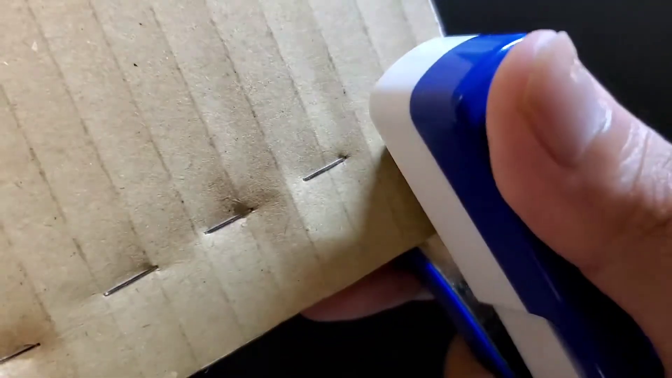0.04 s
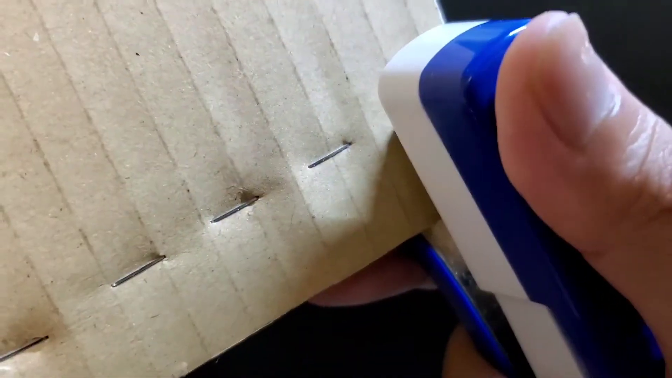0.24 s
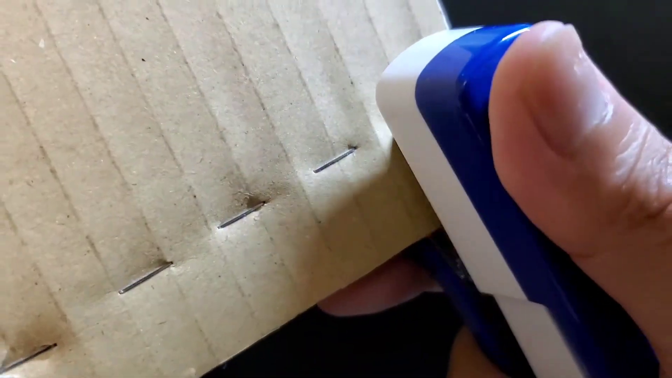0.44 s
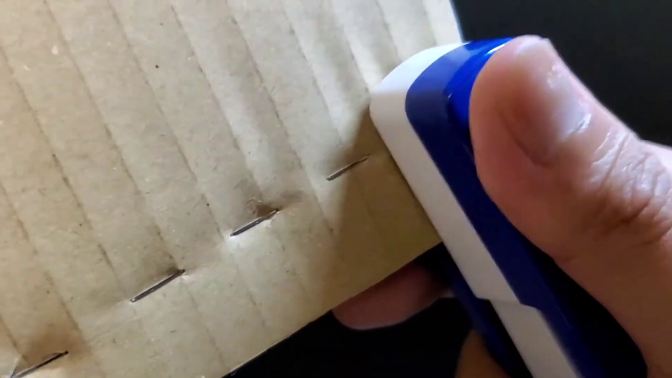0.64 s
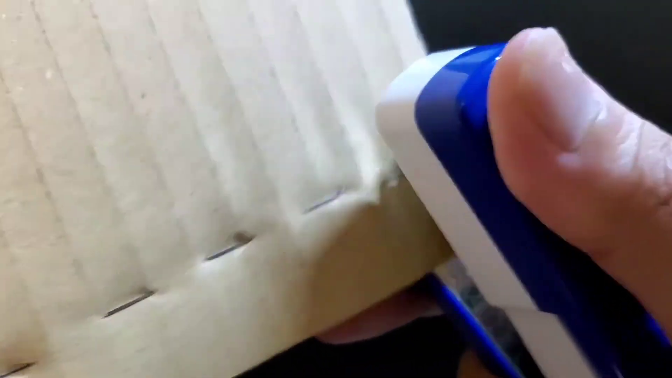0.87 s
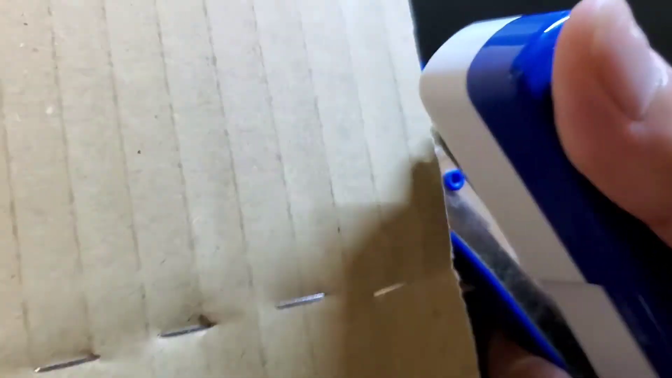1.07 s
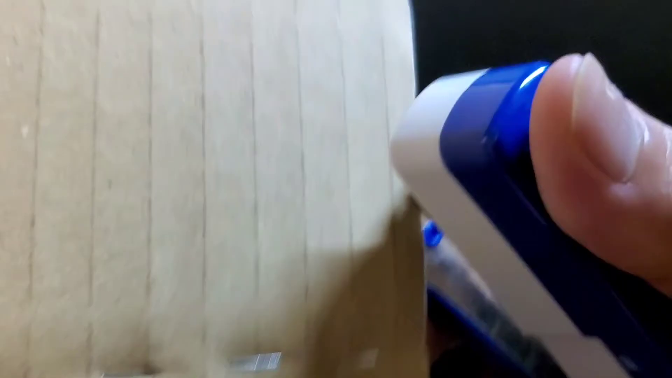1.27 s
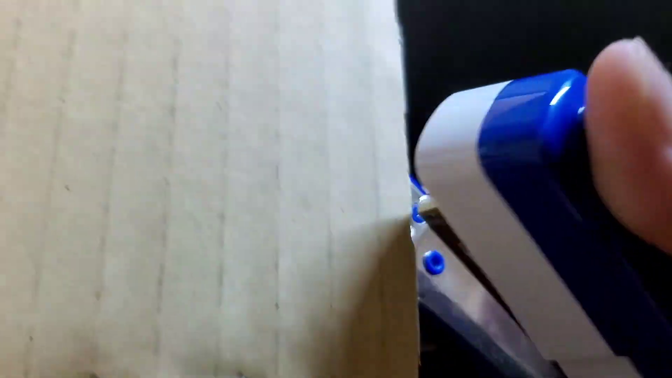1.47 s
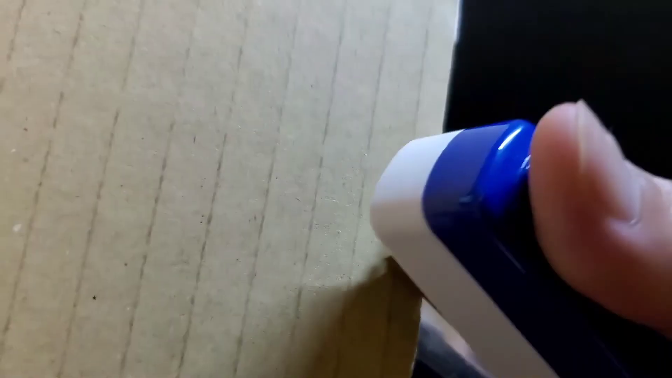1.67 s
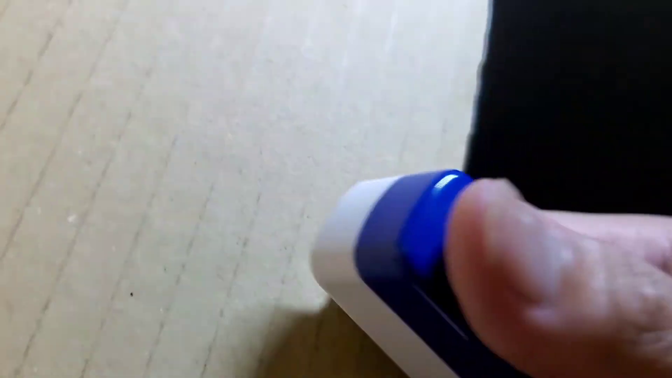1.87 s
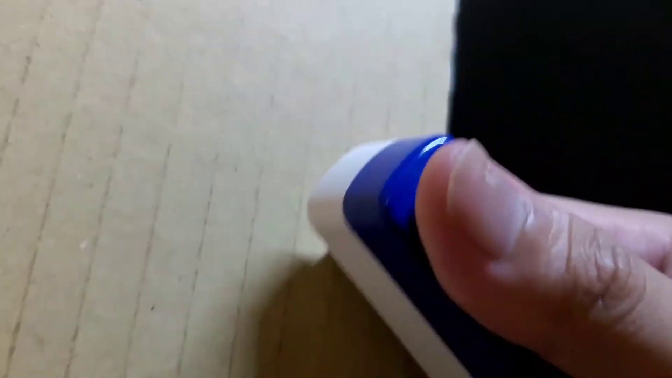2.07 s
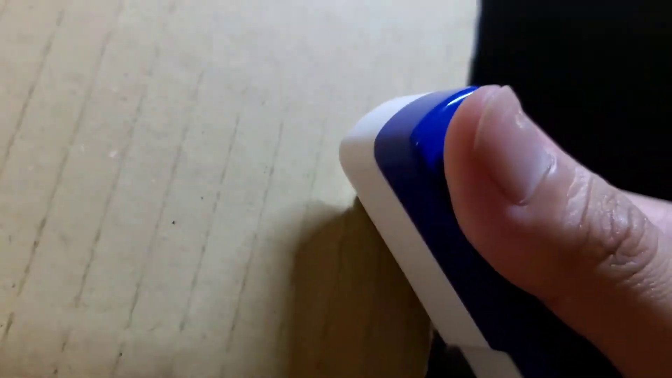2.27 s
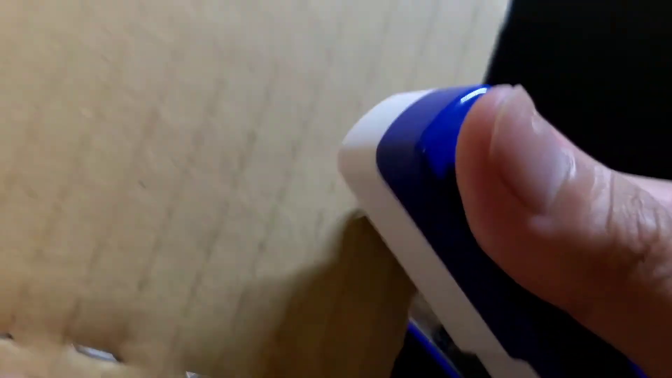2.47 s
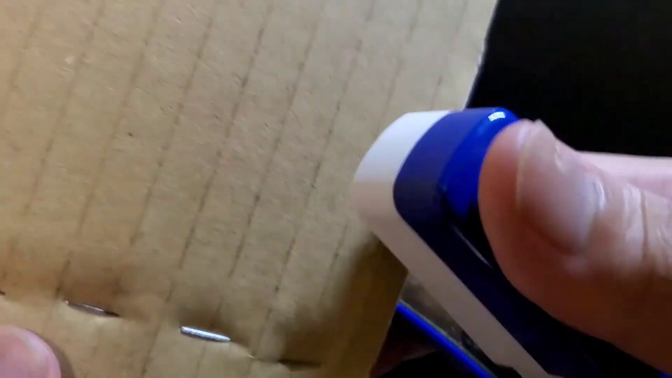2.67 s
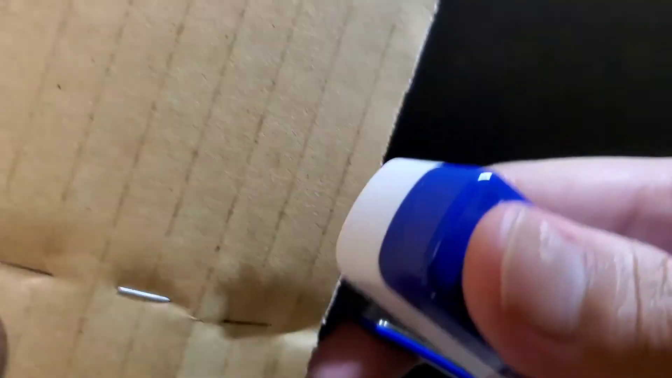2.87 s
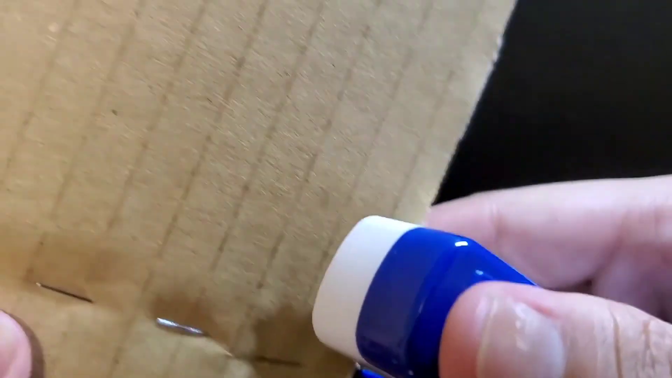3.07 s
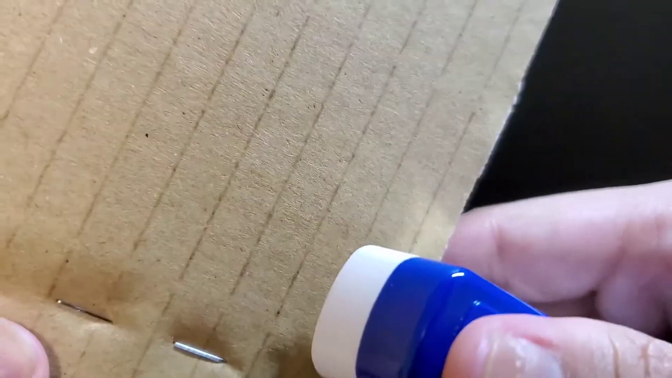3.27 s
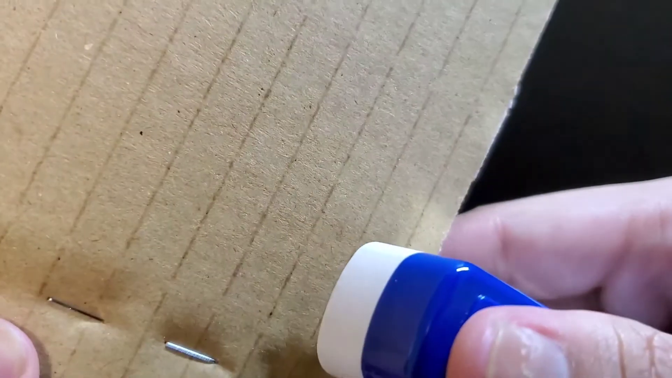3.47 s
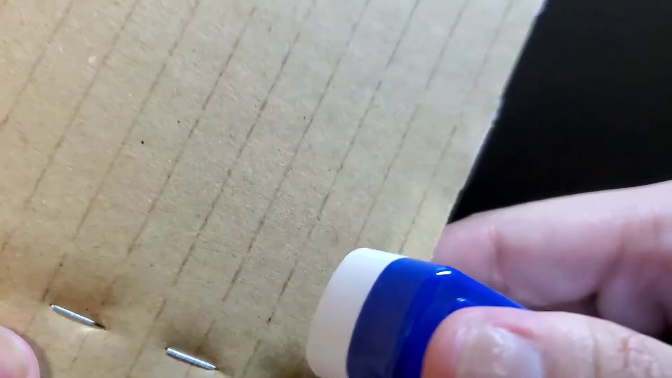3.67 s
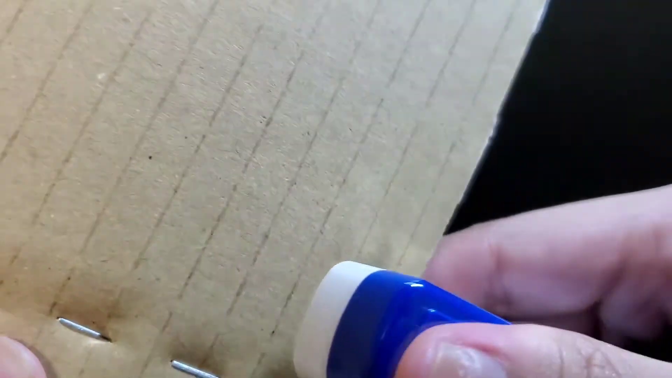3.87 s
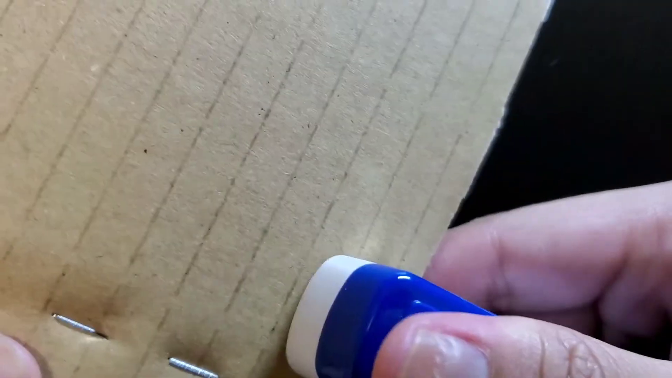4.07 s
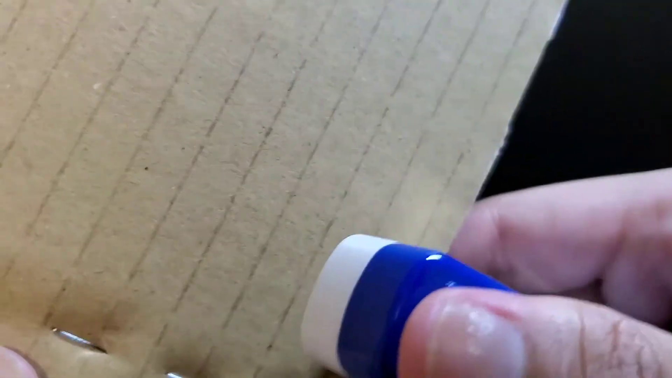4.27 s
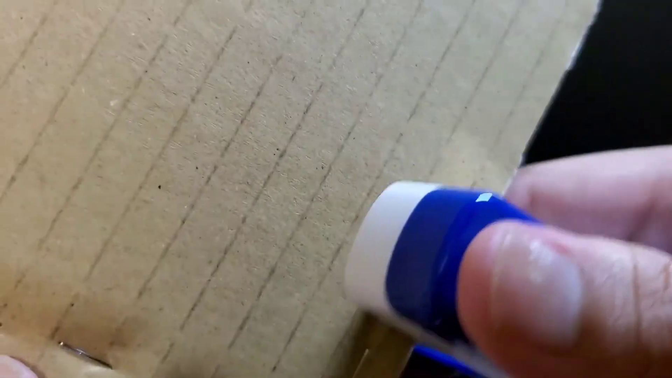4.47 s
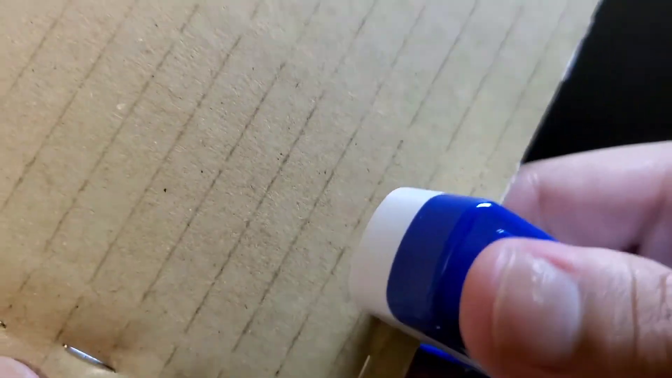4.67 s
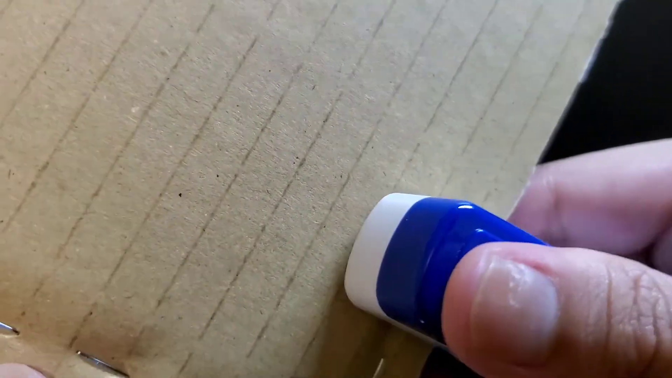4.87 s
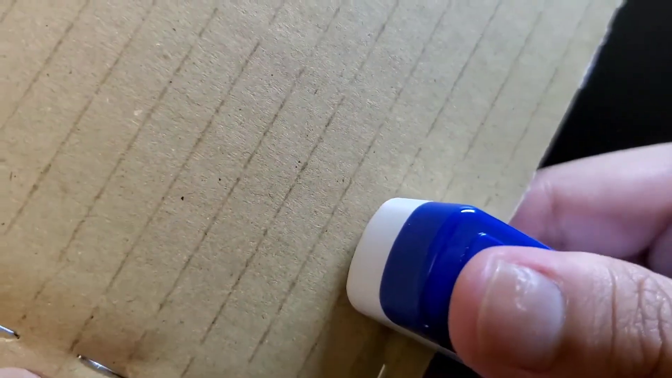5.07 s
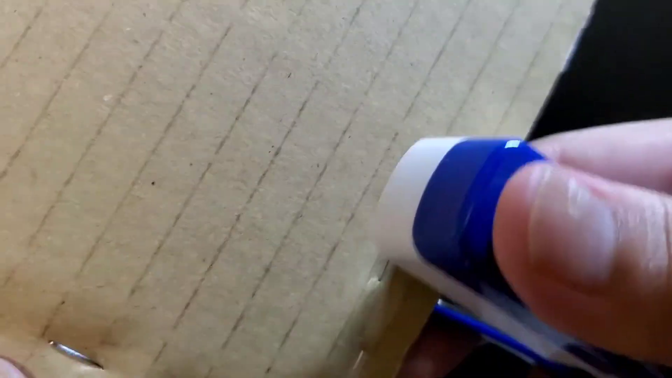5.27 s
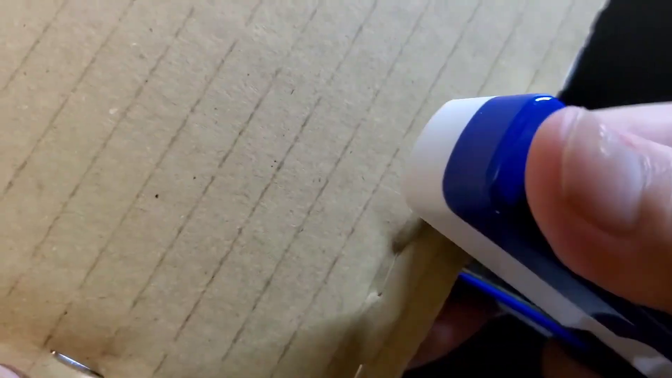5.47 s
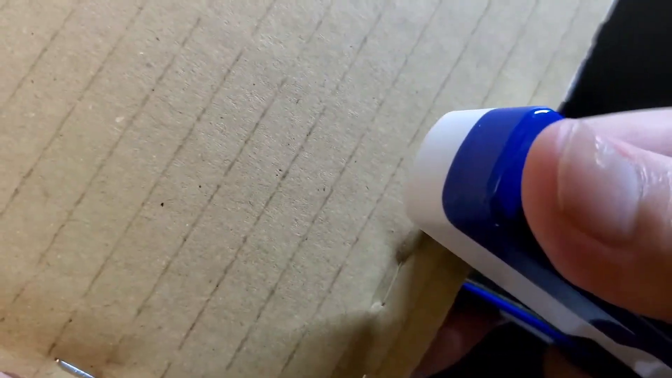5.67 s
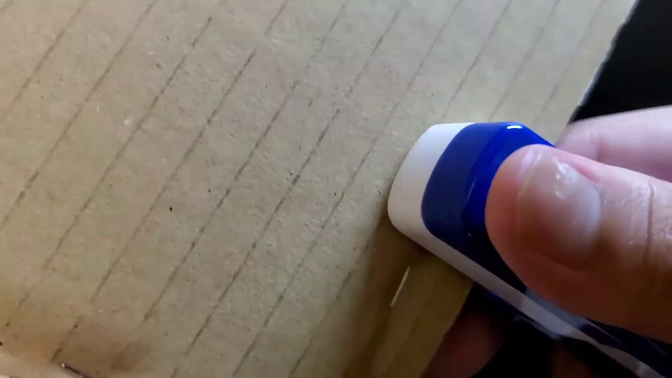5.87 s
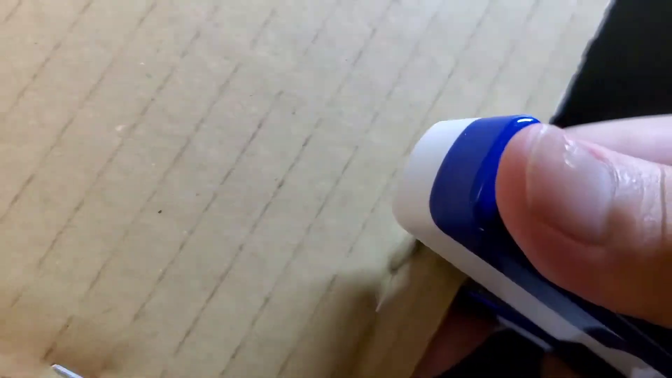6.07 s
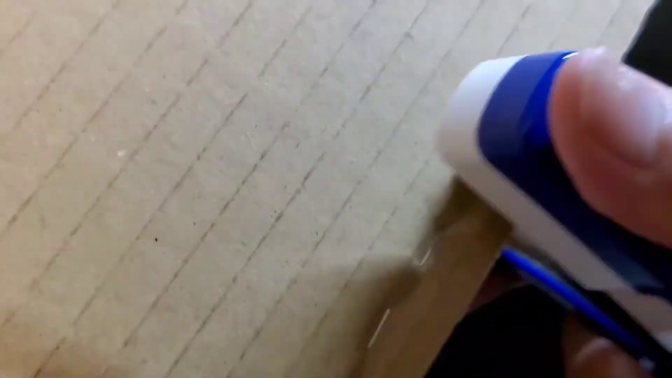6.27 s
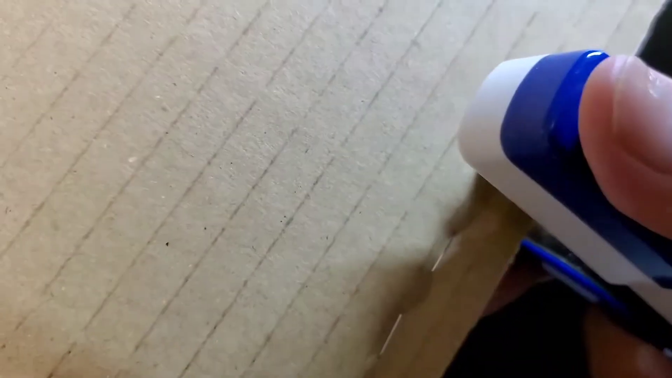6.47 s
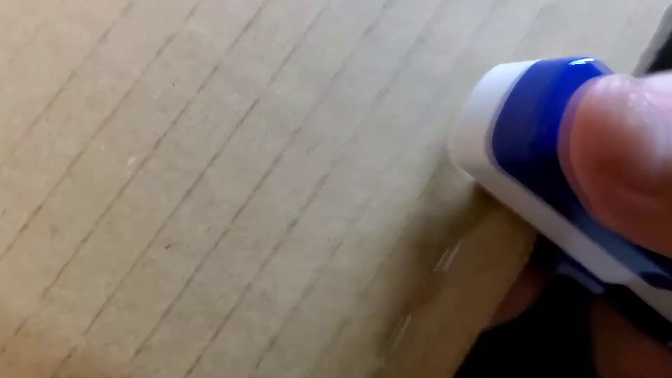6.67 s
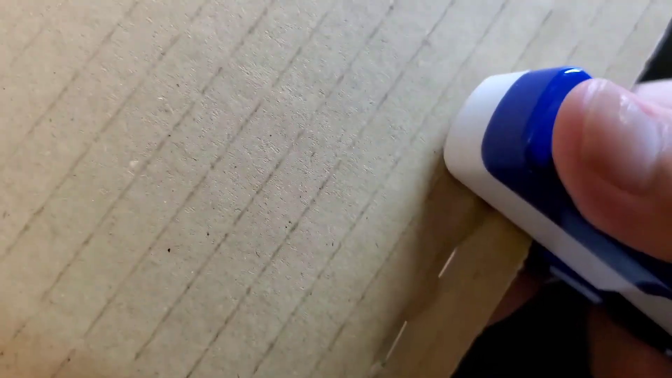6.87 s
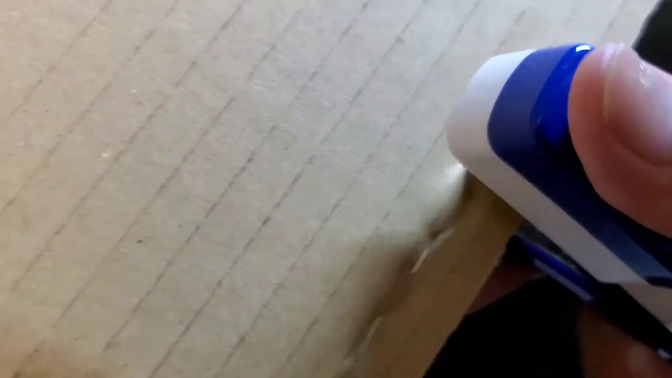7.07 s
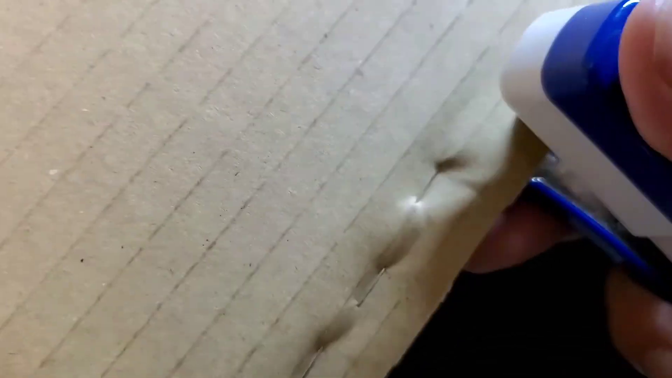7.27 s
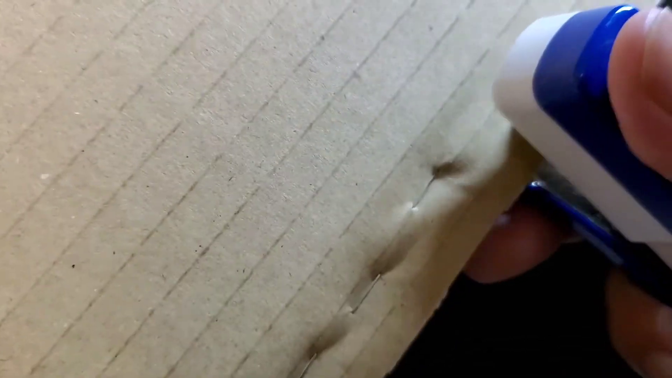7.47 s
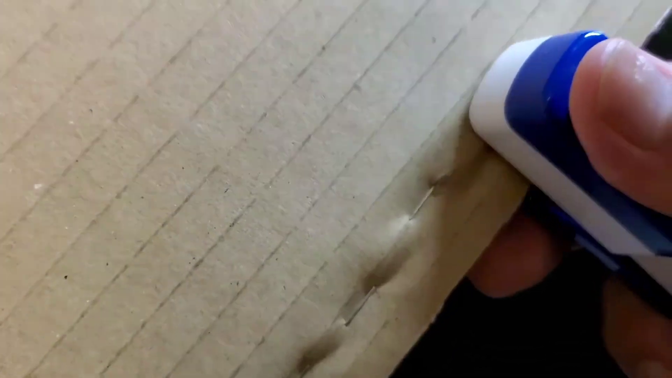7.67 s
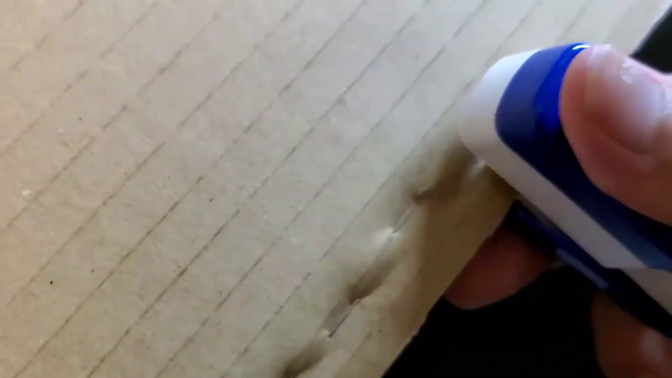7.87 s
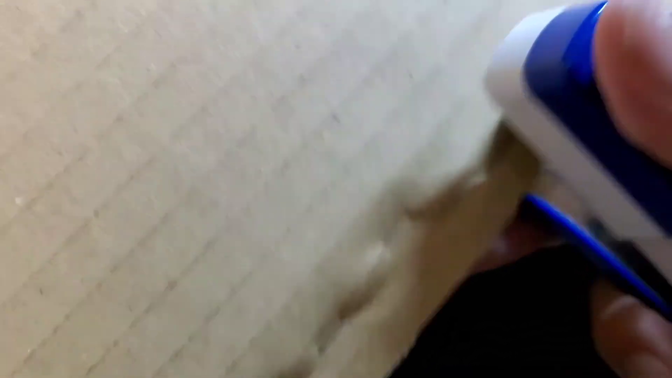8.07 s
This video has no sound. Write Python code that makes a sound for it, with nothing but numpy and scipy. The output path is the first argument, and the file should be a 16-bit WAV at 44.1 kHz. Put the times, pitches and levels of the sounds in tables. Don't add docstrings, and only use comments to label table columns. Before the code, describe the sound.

A stereo microphone sits right beside a plastic-bodied stapler and stiff cardboard. One loud metallic crack and clacking release come first, then dry scuffs, finger taps and loose metal rattles as the sheet is moved. Five more crunching snaps follow at an even pace, each booming briefly through the board, with a short indoor tail and faint room air.

```python
import sys
import numpy as np
from scipy import signal
from scipy.fft import rfft, irfft
from scipy.io import wavfile
from scipy.ndimage import uniform_filter1d

SR = 44100
rng = np.random.default_rng(int(sys.argv[2]) if len(sys.argv) > 2 else 0)


def inscribe(sig):
    pcm = np.round(np.clip(np.atleast_2d(sig).T, -1, 1) * 32767)
    wavfile.write(sys.argv[1], SR, pcm.astype(np.int16))


def field_ratio(decibels):
    return 10 ** (np.asarray(decibels, dtype=float) / 20)


N = 358091
LEAD = 1300

# (frequency [Hz], level [dB], decay by 60 dB [s])
STEEL = [(2950, -3, 0.0067), (3314, -3.5, 0.0088), (4110, 0, 0.0032), (5446, -1, 0.0061),
         (5960, -0.5, 0.0042), (6850, -5.5, 0.013), (7810, -2.5, 0.0045)]
TOP = [(10070, -1.5, 0.0031), (11360, -2, 0.0094), (13600, 0, 0.0014)]
SHELL = [(1827, -19, 0.025), (2004, 7, 0.011), (2150, -1.5, 0.0027)]
SPRING = [(1100, -9.5, 0.28), (1830, -10.5, .35), (2100, 0, 0.24), (2200, -2, .45), (2325, -9, 0.48),
          (2750, -10, 0.21), (4300, -12.5, .25)]
UPPER = [(756, -6.5, 0.029), (791, -2, 0.013), (1170, -5, 0.0036), (1450, -6.5, 0.0018)]
MIDDLE = [(430, -7, 0.064), (510.5, 2, 0.05), (547, 6.5, 0.014)]
BOOM = [(148, -9.5, 0.062), (192.6, 2, 0.07), (237, 9.5, 0.022), (325, 1.5, 0.087)]
SHAKE = [(64, -4, 0.57), (75, -12, 0.05)]
SHEET = [(824, 4.5, 0.23), (797, -2, 0.23)]

# (time [s], steel peak [dB], shell re steel [dB], left-right [dB])
TOUCHES = [
    (0.4256, -31.5, -15, -0.5),
    (3.8292, -35, -15, -2),
    (3.8413, -30.5, -23.5, -0.5),
    (4.8199, -33.5, -28.5, -1.5),
    (4.8264, -40, -36, -4),
    (5.8358, -30, -19.5, -3),
    (6.6882, -33.5, -25.5, -3.5),
    (7.508, -42.5, -16, -3),
    (7.5288, -41, -19, -8),
]
TICKS = [
    (0.5466, -46, -17.5, -4),
    (3.933, -53, -17.5, 7),
    (4.896, -46.5, -28, 0.5),
    (5.8972, -45, -23.5, -6),
    (6.7457, -53, -9.5, -2.5),
    (7.6125, -46.5, -22.5, -5.5),
]
SNAPS = [
    (0.6405, -10.5, -7, -9),
    (4.0203, -11, -9, -3),
    (4.9881, -10.5, -7.5, -3.5),
    (5.9519, -10, -9.5, -5),
    (6.8024, -11, -7, -3.5),
    (7.7412, -13, -4, -3),
]
RELEASES = [
    (0.9342, -24.5, -6.5, 2.5),
    (4.2957, -22, -7.5, 1.5),
    (5.2765, -22.5, -7.5, -3),
    (6.1782, -26, -4.5, 0),
    (7.0666, -28, -3, -1),
    (8.0234, -26, -2, -2),
]
REBOUNDS = [
    (0.9713, -30.5, -9.5, 3),
    (4.324, -42, -9, 4),
    (5.2579, -47, -12.5, 0),
    (5.3492, -44.5, -9.5, 0),
]
# (rows, top end re steel [dB], contact [ms])
PRESS = [(TOUCHES, -18.5, 5), (TICKS, -14.5, 2.4), (SNAPS, -10.5, 4.5), (RELEASES, -11.5, 4.37),
         (REBOUNDS, -8.5, 3)]
# (time [s], steel peak [dB], shell re steel [dB], top re steel [dB])
SLIDE_RATTLES = [(1.1593, -63, 6, 4), (1.2032, -71, -19, -19), (1.3922, -45.5, -6.5, -3.5),
                 (1.521, -53, -2.5, -9), (1.6282, -48.5, -18, -31), (1.7503, -52.5, -9, -20),
                 (1.8278, -45, -15, -14), (1.841, -44, -18, -2.5), (1.8911, -49.5, -9.5, -11),
                 (2.0542, -49.5, -8, -12), (2.2734, -53, -12, -13), (2.4463, -49.5, -34, -13),
                 (2.5253, -68, 13, -23), (2.5401, -47.5, -10, -7), (2.6284, -65, -4, 4),
                 (2.6968, -54.5, -6, -18), (2.8556, -67, -16, 9.5), (3.344, -48.5, -18, -14)]
STEP_RATTLES = [(0.0094, -69.5, 1, -22), (3.3175, -50, -5.5, -40), (4.4893, -46, -13.5, -19),
                (4.5471, -57, -9.5, -29), (4.6694, -70, 7.5, -28), (6.416, -52, -9.5, -28),
                (7.3393, -53.5, -5.5, -13)]
# (rows, left-right [dB], contact [ms])
RATTLE = [(SLIDE_RATTLES, 1.5, 6.2), (STEP_RATTLES, 0, 6.9)]

# (time [s], upper modes peak [dB], middle re upper [dB], boom re upper [dB])
SNAP_BLOWS = [
    (0.64, -17.5, -3, -4.5),
    (4.021, -11.5, -12.5, -15.5),
    (4.992, -17, -8, -7.5),
    (5.951, -15, -6.5, 0),
    (6.8022, -13.5, -11.5, -3.5),
    (7.742, -15.5, -4.5, 0),
]
JAW_BLOWS = [(0.423, -38.5, 0, -3), (0.936, -23, -13, -12), (3.826, -30, -12.5, -9.5),
             (3.839, -38.5, -5, -4.5), (4.299, -19, -15.5, -13), (4.325, -39, -2.5, -5), (4.818, -46, 2, 0),
             (5.279, -15, -14, -14), (5.347, -33, -10, -16), (5.839, -40, -1, -1), (6.177, -29, -8.5, -10),
             (6.691, -36.5, -4, -9.5), (7.066, -35, -12.5, -8), (7.509, -59, 9.5, 1), (7.529, -42, -10, 2),
             (8.021, -36, -3, -1.5), (8.06, -47, -2, 1)]
FINGER_TAPS = [(0.073, -47.5, -3.5, -4.5), (1.079, -57, 8, 7.5), (1.158, -31, -7, -2.5),
               (1.17, -54.5, 13, 15.5), (1.393, -71.5, 9, 23), (1.671, -57.5, 11.5, 1),
               (1.747, -41.5, -11.5, -0.5), (1.828, -56.5, 12, 9), (1.895, -65, 11, -3.5),
               (1.909, -58, -14, 9), (1.936, -57.5, 10, 10), (2.059, -66, 18.5, 19),
               (2.119, -71.5, 18, 10.5), (2.273, -44, 1.5, -3.5), (2.533, -51, 1.5, 0.5),
               (2.579, -60, 9, 1), (2.594, -59, 2, 6), (2.625, -41, 2, -0.5), (2.726, -53.5, 2, 2),
               (2.819, -55.5, 0.5, 12.5), (2.851, -38.5, -7.5, -1), (2.938, -51.5, -5.5, 5.5),
               (3.162, -77, -13, 19.5), (3.343, -33, -8.5, -9.5), (4.512, -55, 6, 6),
               (4.668, -35, -8, -17.5), (6.45, -53, -3.5, -7.5), (7.292, -43.5, -8.5, -1.5),
               (7.358, -43, -1.5, 2.5)]
# (rows, contact [ms], extra contact per dB of boom [ms/dB])
BLOW = [(SNAP_BLOWS, 2.7, -0.2), (JAW_BLOWS, 2.1, 0.023), (FINGER_TAPS, 1.83, 0.069)]

# (start [s], hold [s], paper
# hiss [dB], board murmur [dB])
RUB_STROKES = [(0.0, 0.11, -80, -63.5), (0.365, 0.15, -95, -66), (0.538, .1, -75, -67.5),
               (.68, 0.079, -75.5, -74), (.98, 0.11, -70, -76), (1.155, 0.14, -77.5, -68),
               (1.392, 0.007, -63, -59), (1.515, 0.019, -65.5, -54), (1.682, 0.007, -54.5, -47.5),
               (1.744, 0.019, -63.5, -58.5), (1.85, .06, -62.5, -61), (1.9, .021, -69, -52.5),
               (1.952, 0.018, -59, -68), (2.064, 0.2, -60.5, -58.5), (2.285, 0.0091, -71, -58.5),
               (2.37, 0.024, -66, -60), (2.468, 0.017, -58, -61.5), (2.608, 0.012, -61.5, -45.5),
               (2.715, .015, -62.5, -57.5), (2.836, 0.017, -74, -54), (2.952, 0.021, -74, -60.5),
               (3.174, 0.026, -78.5, -75), (3.315, 0.13, -78, -76),
               (3.81, .19, -74, -65.5), (4.048, 0.29, -85.5, -83), (4.491, .03, -98, -52),
                (4.58, .1, -112, -63), (4.861, .03, -84.5, -61.5), (4.95, 0.37, -82, -81.5),
                (5.45, .04, -77, -62), (5.509, 0.0079, -73, -59), (5.88, 0.016, -72, -55.5),
                (5.95, 0.31, -81.5, -61.5), (6.33, 0.029, -85, -48.5), (6.43, 0.025, -94, -63.5),
                (6.73, 0.028, -75, -55.5), (6.8, 0.27, -74.5, -77.5), (7.22, 0.076, -68.5, -52),
                (7.35, 0.007, -84, -56), (7.551, 0.067, -83.5, -67.5), (7.8, 0.11, -84.5, -85.5),
                (8.0, 0.033, -73, -55.5), (8.08, 0.011, -88, -71)]
# (frequency [Hz], level per Hz [dB])
HISS = [(530, -40.5), (900, -7.5), (1030, -12.5), (1680, -8), (1930, -4.5), (2640, -8), (14600, -10),
        (15600, -66.5)]
RUMBLE = [(8.8, -42.5), (15, -8), (54, 5), (86, -14.5), (151, -6), (185, -18.5), (260, -56), (440, -120)]
# (time [s], level [dB])
HAND = [(0.0, -67.5), (4.23, -69), (4.41, -71), (7.01, -76.5), (7.24, -81.5), (8.12, -66.5)]
# (frequency [Hz], left-right likeness [0-1])
SAME = [(60, 1), (240, 0.3), (950, 0.11), (3770, 0.035), (15000, 0.09)]

# (frequency [Hz], decay by 60 dB [s])
ROOM = [(100, 0.35), (260, 0.88), (700, 0.66), (1840, 0.21), (4850, 0.26), (12800, 0.17)]
# (frequency [Hz], level per Hz [dB])
FLOOR = [(59, -31.5), (100, 4), (578, -21), (1240, -23.5), (7160, -39), (8300, -47), (14100, -32),
         (15600, -56)]
# (frequency [Hz], level [dB])
WHINE = [(399, -4), (798, -5)]
# (time [s], level [dB])
WHINE_DB = [(0, -105.), (3.9, -105.), (4.3, -88), (5.6, -77.5), (6.0, -82.5), (6.55, -87), (7.0, -94),
            (8.12, -99)]


def stapler():
    rows = contacts()
    out, trains = np.zeros((2, N + LEAD)), np.zeros((3, N))
    rain = rng.standard_normal((len(rows), 2, 1700))
    detune = rng.uniform(0.94, 1.05, (len(rows), 7))
    for (s, db, shell_db, top_db, pan_db, ms), r, d in zip(rows, rain, detune):
        steel = ring(contact(ms, r, same=0.5, power=1, scrape_db=-24.5), STEEL, d, lead_us=165)
        top = ring(contact(0.86 * ms, r, same=0.98, power=2, scrape_db=-25.5), TOP, d, lead_us=140)
        shell_force = contact(ms, r, same=0.52, power=2, scrape_db=-31)
        shell = ring(shell_force, SHELL, 1 + 0.82 * (d - 1), lead_us=30, size=4096)
        add(out, s, field_ratio(db - 0.5) * sides(pan_db) * steel)
        add(out, s, field_ratio(db + top_db + 6.5) * sides(0.65 * pan_db) * top)
        add(out, s, field_ratio(db + shell_db + 9) * sides(pan_db) * shell)
        trains[:, round(s * SR)] = field_ratio(db + np.array([0, top_db + 7, shell_db + 12])) * np.sqrt(ms)
    blunt = [[(hz, db, 0.51 * t60) for hz, db, t60 in body] for body in (STEEL, TOP)]
    around = heard_around(trains, blunt + [SHELL])
    spring = heard_around(trains[2:], [SPRING])
    return out[:, LEAD:], around, spring


def contacts():
    found = []
    for rows, top_db, ms in PRESS:
        found += [(s, db, shell_db, top_db, pan_db, ms) for s, db, shell_db, pan_db in rows]
    for rows, pan_db, ms in RATTLE:
        found += [(*row, pan_db, ms) for row in rows]
    return sorted(found)


def contact(ms, rain, same, power, scrape_db):
    t_ms = (np.arange(rain.shape[1]) - LEAD) * 1000 / SR
    u = np.maximum(t_ms, 0) / min(ms, 5)
    chatter = 0.92 * u ** 0.36 * np.exp(-2.4 * u ** 1.6)
    scrape = field_ratio(scrape_db + 1.5 * t_ms) * (t_ms < 0)
    a, b = np.sign(rain) * abs(rain) ** power
    return np.array([a, same * a + np.sqrt(1 - same ** 2) * b]) * (chatter + scrape)


def ring(force, modes, detune, lead_us=0, size=2048):
    hz = np.fft.rfftfreq(size, 1 / SR)
    lead = np.exp(2j * np.pi * hz * np.array([[0], [-1e-6 * lead_us]]))
    out = irfft(rfft(force, size) * response(modes, hz, detune) * lead)
    return out / abs(out.mean(0)).max()


def response(modes, hz, detune=1):
    total = 0
    for k, ((f, db, t60), d) in enumerate(zip(modes, detune * np.ones(7))):
        resonance = 1j * hz / ((f * d) ** 2 - hz ** 2 + 2.2j * hz / t60)
        total = total + (-1) ** k * field_ratio(db) * resonance
    return total


def heard_around(trains, bodies):
    hz = np.fft.rfftfreq(16384, 1 / SR)
    total = 0
    for train, modes in zip(trains, bodies):
        shape = irfft(response(modes, hz))
        total = total + signal.oaconvolve(train, shape / np.linalg.norm(shape))[:N]
    return total


def board():
    rows = knocks()
    out, trains = np.zeros((2, N + LEAD)), np.zeros((2, N))
    rain = rng.standard_normal((len(rows), 2, 1700))
    detune = rng.uniform(0.84, 1.1, (len(rows), 7))
    for (s, db, middle_db, boom_db, ms), r, d in zip(rows, rain, detune):
        push = contact(ms, r + 0.5, same=0.92, power=2, scrape_db=-27)
        shove = contact(ms, r + 4.4, same=0.89, power=1, scrape_db=-27.5)
        upper = ring(push, UPPER, 1 + 0.5 * (d - 1), lead_us=100, size=4096)
        middle = ring(push, MIDDLE, d, lead_us=25, size=4096)
        boom = ring(shove, BOOM, d, size=4096)
        sound = field_ratio(-4.5) * upper
        sound += field_ratio(middle_db + 6) * sides(-1.8) * middle
        sound += field_ratio(boom_db + 3) * sides(5.3) * boom
        add(out, s, field_ratio(db) * sides(min(-0.25 * db + 0.5, 7)) * sound)
        trains[:, round(s * SR)] = field_ratio(db + np.array([boom_db + 6, -2.5]))
    shake = heard_around(trains[:1], [SHAKE])
    sheet = heard_around(trains[1:], [SHEET])
    thump = np.array([shake, 2.2 * np.roll(shake, 150)])
    return out[:, LEAD:] + field_ratio(-2.5) * thump + sides(5.4) * sheet


def knocks():
    return sorted((*row, ms + ms_per_db * row[3]) for rows, ms, ms_per_db in BLOW for row in rows)


def handling():
    hiss_gain, murmur_gain = strokes()
    rumble_gain = follow(HAND)
    hiss_gain = hiss_gain + field_ratio(-19) * rumble_gain
    murmur_gain = murmur_gain + field_ratio(-11.5) * rumble_gain
    hiss = noise(lambda hz: field_ratio(read(HISS, hz)), size=256, patchy_db=3.5, flicker_db=2.46)
    murmur = noise(murmur_colour, size=1024, patchy_db=-2, flicker_db=5)
    rumble = noise(lambda hz: field_ratio(read(RUMBLE, hz)), size=4096, patchy_db=-0.5, flicker_db=-0.7)
    crunch = 0.62 * murmur + 0.54 * grit()
    out = hiss_gain * sides(1.8) * hiss
    out += murmur_gain * sides(4.1) * crunch
    return out + (rumble_gain + 1.1 * hiss_gain) * sides(0.3) * rumble


def strokes():
    rise_db_s, fall_db_s = 262.5, 211
    t, gains = np.arange(0, N + 64, 64) / SR, 0
    for s, hold, hiss_db, murmur_db in RUB_STROKES:
        under_db = rise_db_s * np.maximum(s - t, 0) + fall_db_s * np.maximum(t - s - hold, 0)
        gains = np.maximum(gains, field_ratio(np.array([[hiss_db], [murmur_db]]) - under_db))
    return [np.interp(np.arange(N) / SR, t, g) for g in gains]


def murmur_colour(hz):
    modes = abs(response(BOOM, hz))
    for body, db in [(MIDDLE, -5.5), (UPPER, -5.5), (SHEET, -21)]:
        modes = modes + field_ratio(db) * abs(response(body, hz))
    return modes * hz / (hz + 150)


def grit():
    luck = rng.random((2, N))
    ticks = luck[0] < 450 / SR
    sizes = (-np.log(luck[1] + 1e-9)) ** 2.4
    slips = uniform_filter1d(ticks * sizes, size=28)
    return evened(heard_around([slips, 1.5 * slips, 0.19 * slips], [BOOM, MIDDLE, UPPER]))


def noise(gain, size, patchy_db, flicker_db):
    hz = np.fft.rfftfreq(size, 1 / SR)
    a, b, c, d, patches = rng.standard_normal((4 * N // size + 5, len(hz), 5)).T
    flicker = patches[0]
    patches = uniform_filter1d(patches, size=6, axis=0)
    patches = evened(uniform_filter1d(patches, size=10, axis=1))
    same = read(SAME, hz)[:, None]
    left, other = a + 1j * b, c + 1j * d
    z = np.array([left, same * left + np.sqrt(1 - same ** 2) * other])
    z *= gain(hz)[:, None] * field_ratio(patchy_db * patches + flicker_db * flicker)
    return evened(signal.istft(z, nperseg=size, noverlap=3 * size // 4)[1][:, :N])


def evened(x):
    return x / np.sqrt(np.mean(x ** 2) + 1e-20)


def read(points, hz):
    f, value = np.transpose(points)
    return np.interp(np.log(hz + 1), np.log(f + 1), value)


def follow(rows):
    s, db = np.transpose(rows)
    return field_ratio(np.interp(np.arange(N) / SR, s, db))


def sides(pan_db):
    return field_ratio(np.array([[0.5], [-0.5]]) * pan_db)


def add(mix, s, sound):
    part = mix[:, round(s * SR):][:, :sound.shape[1]]
    part += sound[:, :part.shape[1]]


def room(x):
    taps = np.zeros((2, SR // 2))
    grid = np.arange(200, SR // 2 - 12, 12)
    at = grid + rng.integers(0, 12, (2, len(grid)))
    np.put_along_axis(taps, at, rng.choice([-1., 1.], at.shape), 1)
    hz, t, z = signal.stft(taps, SR, nperseg=256)
    decay = field_ratio(-60 * t / read(ROOM, hz)[:, None])
    tail = signal.istft(z * decay, SR, nperseg=256)[1]
    return signal.fftconvolve(x, tail / np.linalg.norm(tail[0]), axes=1)[:, :N]


def background():
    waver, flutter = (evened(uniform_filter1d(v, size=4000)) for v in rng.standard_normal((2, N)))
    turns = np.cumsum(1 + 0.0028 * waver) / SR
    whine = sum(field_ratio(db) * np.sin(2 * np.pi * hz * turns) for hz, db in WHINE)
    air = noise(lambda hz: field_ratio(read(FLOOR, hz)), size=1024, patchy_db=1.5, flicker_db=-3.5)
    return field_ratio(-76.5) * air + follow(WHINE_DB) * field_ratio(3 * flutter) * whine


def scene():
    clicks, around, spring = stapler()
    blows = board()
    buzz = evened(uniform_filter1d(rng.standard_normal((2, N)), size=500, axis=1))
    singing = field_ratio(-14) * sides(-1.5) * spring * (0.29 + buzz)
    tail = room(field_ratio(-5) * around + field_ratio(-28.5) * blows)
    return clicks + singing + blows + tail + handling() + background()


def top_cut(x):
    return signal.sosfilt(signal.butter(12, 15800, fs=SR, output="sos"), x)


def record(dry):
    thin = signal.sosfilt(signal.butter(2, 42, "high", fs=SR, output="sos"), dry)
    soft = np.tanh(thin / 1.062) * 1.066
    edge = signal.firwin(301, 15000, window=("kaiser", 9), fs=SR)
    finished = signal.oaconvolve(soft, edge[None], "same")
    return top_cut(finished)


dry = scene()
out = record(dry)
inscribe(out)
```